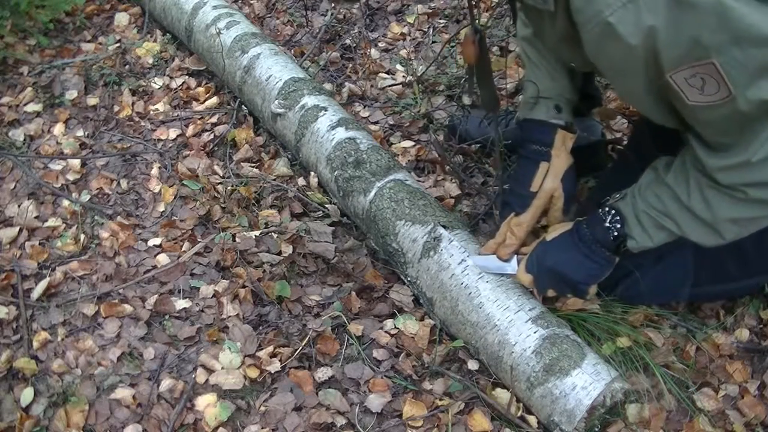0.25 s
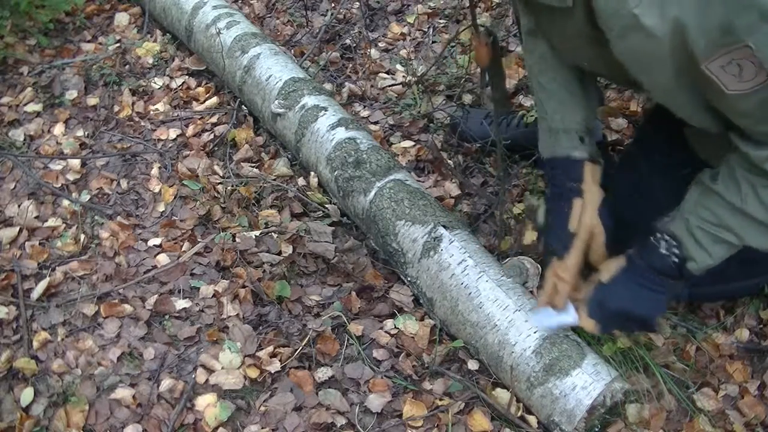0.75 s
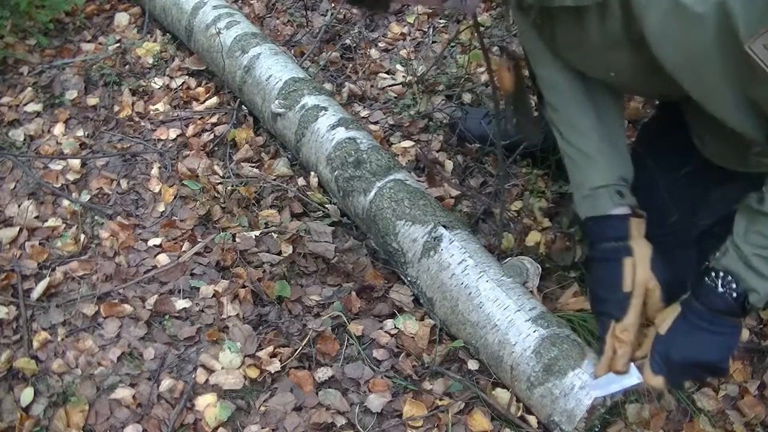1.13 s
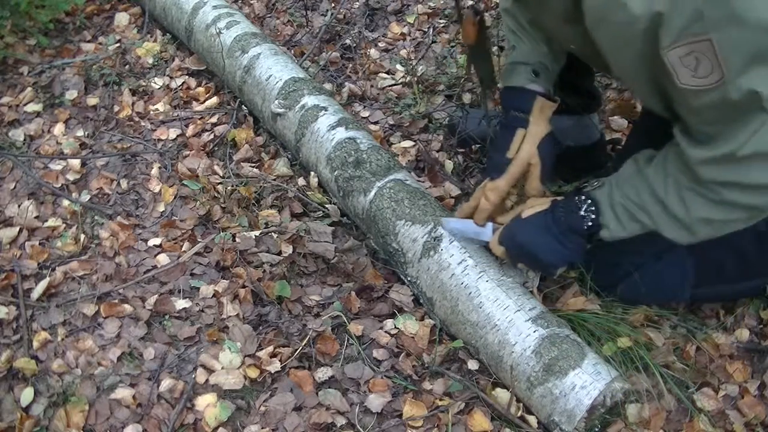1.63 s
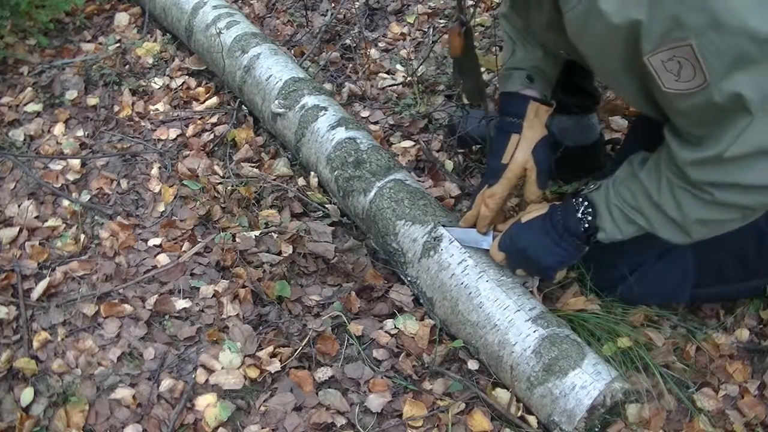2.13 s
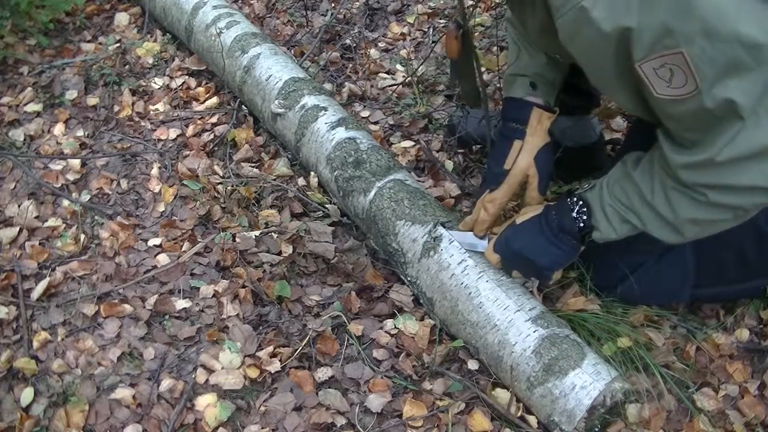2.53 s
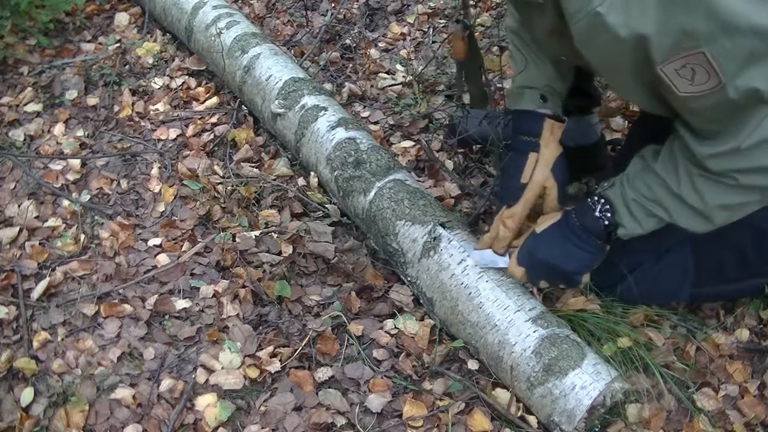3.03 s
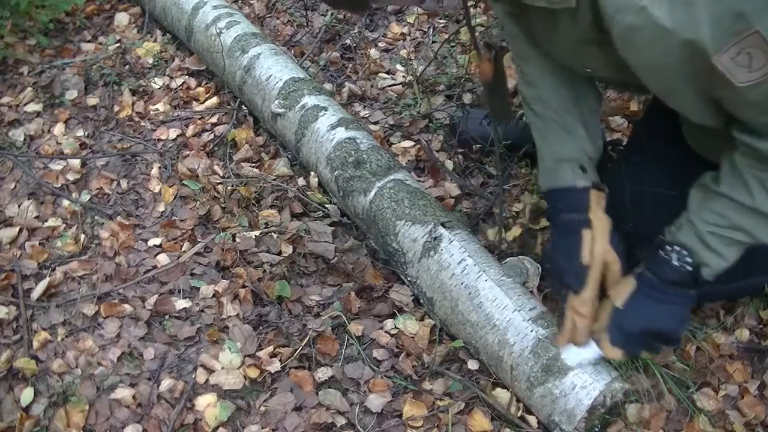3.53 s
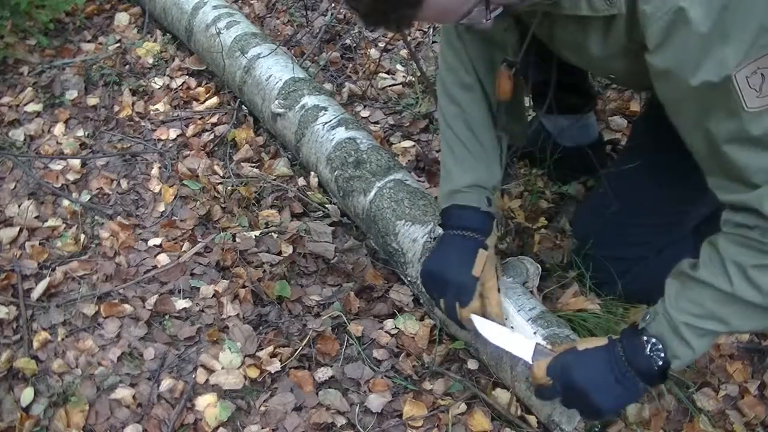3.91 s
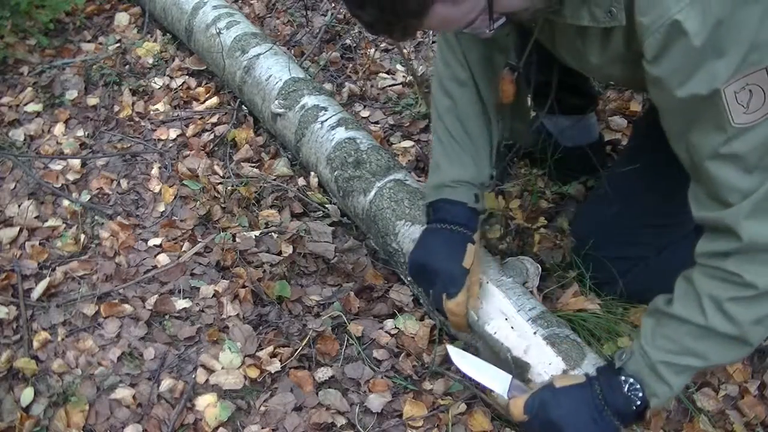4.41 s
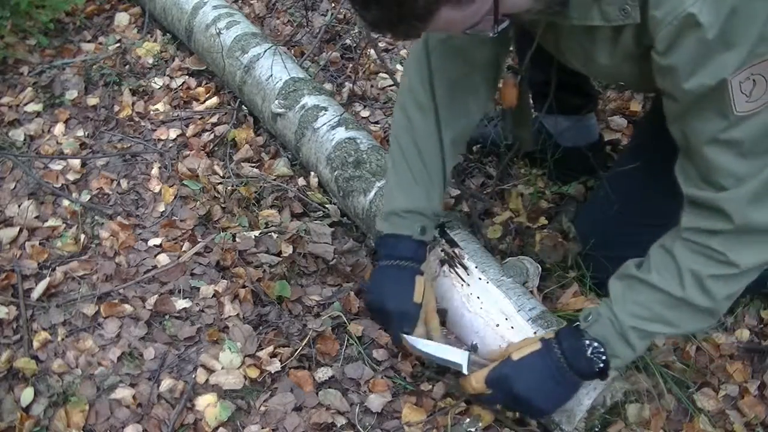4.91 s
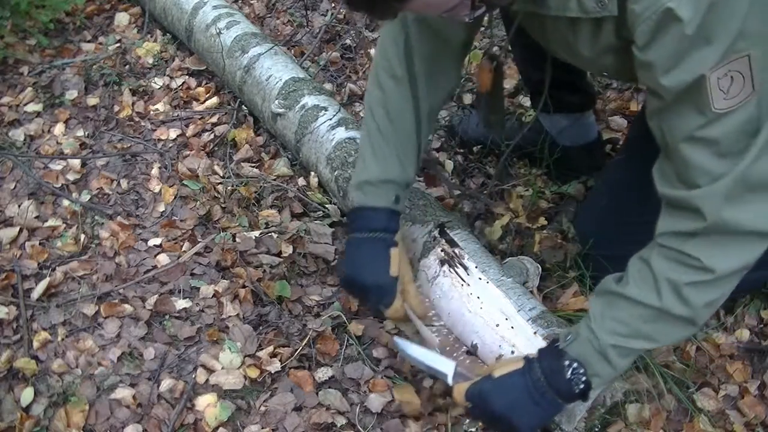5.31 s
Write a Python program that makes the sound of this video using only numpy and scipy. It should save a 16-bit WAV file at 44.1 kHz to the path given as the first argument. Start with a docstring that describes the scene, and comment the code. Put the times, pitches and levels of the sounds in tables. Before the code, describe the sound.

Close crisp bark peeling: faint rustles and short scratches, a hard crackly rip, a brief soft rub, then looser rattling tears with small pops.

```python
"""Peeling bark off a birch log

A gloved hand slits the bark with a knife and peels it off, kneeling in dry leaves in a quiet forest.
Fibres let go in showers of tiny filtered noise bursts, duller where the loose sheet prevails; single
snaps and hollow pops are decaying sines, and the log answers with low thumps of noise-driven modes.
The glove is band-passed slips, the blade rings under grit, the forest is noise with a drifting spectrum.
A small camera with two close microphone ports stands near: the ports differ in level and phase."""
import sys
import numpy as np
from scipy import signal
from scipy.fft import rfft, irfft, next_fast_len
from scipy.io import wavfile
from scipy.ndimage import uniform_filter1d

SR = 44100
rng = np.random.default_rng(int(sys.argv[2]) if len(sys.argv) > 2 else 0)


def waveform_to_disk(signal):
    """Save audio, clipped to [-1, 1], as 16-bit WAV at the path in sys.argv[1]."""
    frames = np.transpose(np.atleast_2d(signal))
    scaled = np.clip(frames, -1, 1) * 32767
    samples = np.round(scaled).astype(np.int16)
    wavfile.write(sys.argv[1], SR, samples)


N = 245195

# relative spectrum of tight fibres as the small microphones pick them up:
# (frequency [Hz], level per hertz [dB])
TIGHT_SPECTRUM = [(700, -28.5), (1300, -14.5), (2000, -13), (2900, -6.5), (3550, -5.5), (4100, -3.5),
                  (4700, 3), (5600, -3), (7500, -7.5), (8700, -14), (10700, -14), (12300, -21),
                  (14500, -27.5), (16500, -10)]


def amp(db):
    """Decibel law: a level becomes an amplitude ratio."""
    return 10 ** (np.asarray(db) / 20)


def evened(x):
    """Normalization to unit root mean square."""
    return x / np.sqrt(np.mean(x ** 2) + 1e-20)


def read(points, hz):
    """Linear interpolation of a curve over logarithmic frequency."""
    f, value = np.transpose(points)
    return np.interp(np.log(hz + 1), np.log(f + 1), value)


def curves(rows):
    """Linear interpolation of each column over time."""
    s, *columns = np.transpose(rows)
    times = np.arange(N) / SR
    return [np.interp(times, s, column) for column in columns]


def add(mix, s, sound):
    """Superposition: adds a sound in place from the time s [s]."""
    part = mix[max(round(s * SR), 0):][:len(sound)]
    part += sound[:len(part)]


def colour(points, size=1024):
    """Minimum-phase filter of energy 1: the Hilbert transform of the log gain gives the phase."""
    hz = abs(np.fft.fftfreq(4 * size, 1 / SR))
    log_gain = np.log(amp(np.maximum(read(points, hz), -100)))
    taps = np.fft.ifft(np.exp(np.conj(signal.hilbert(log_gain)))).real[:size]
    return taps / np.linalg.norm(taps)


def swells(rows):
    """Incoherent sum: the powers of (peak [s], rise [s], fall [s], level [dB]) humps add up to a gain."""
    bend = 1.3  # 1 = pointed peak, 2 = round peak
    t = np.arange(0, N, 32) / SR
    power = 0
    for s, rise, fall, db in rows:
        distance = abs(t - s) / np.where(t < s, rise, fall)
        power = power + amp(db - 20 * distance ** bend) ** 2  # rise and fall each span 20 dB
    return np.interp(np.arange(N) / SR, t, np.sqrt(power))


def shower(spread_db, per_s, t60, count=60):
    """Shot noise of steady mean power: chance impulses excite a few bursts, each with its own colour."""
    humps_db = 4  # how unevenly each burst is coloured
    struck = rng.exponential(1, N), rng.random(N) < per_s / SR
    size = amp(spread_db * np.minimum(struck[0], 4.5)) * struck[1]
    size = size / np.sqrt(uniform_filter1d(size ** 2, size=6000) + 1e-9)
    shape = rng.integers(0, count, N)
    t = np.arange(600) / SR
    out = np.zeros(N)
    for k, stretch in enumerate(np.geomspace(.3, 2.5, num=count)):
        humps = rng.standard_normal(len(t) // 2 + 1)
        humps = evened(uniform_filter1d(uniform_filter1d(humps, size=12), size=12))
        coloured = irfft(rfft(rng.standard_normal(len(t))) * amp(humps_db * humps))
        burst = coloured * amp(-60 * t / (t60 * stretch))
        out += signal.oaconvolve(size * (shape == k), burst / np.linalg.norm(burst))[:N]
    return evened(out)


def forest():
    """Random short-time spectra: distant wash and stirring leaves, in patches that drift in level."""
    # relative spectrum of the wash: (frequency [Hz], level per hertz [dB])
    wash_spectrum = [(15, -46), (25, -5), (87, 2.5), (317, 6.5), (624, -1.5), (936, -1.5), (1260, -8),
                     (2160, -4.5), (4740, -9), (6920, -4.5), (8830, -14), (10700, -28), (12200, -20),
                     (14400, -22), (16000, -20)]
    # left-right likeness, limited below to -1..1: (frequency [Hz], correlation [1])
    likeness = [(60, 0.017), (180, -0.59), (550, 0.53), (1650, 0.25), (4970, -1.44), (15000, 0.87)]
    level_db, patch_db = -56.5, 1.5
    frames, hz = N // 256 + 5, np.fft.rfftfreq(1024, 1 / SR)
    a, b, c, d, patches = rng.standard_normal((frames, 513, 5)).T
    patches = uniform_filter1d(patches, size=12, axis=0)  # along frequency
    patches = evened(uniform_filter1d(patches, size=14, axis=1))  # along time
    same = np.clip(read(likeness, hz), -1, 1)[:, None]
    left = a + 1j * b
    right = same * left + np.sqrt(1 - same ** 2) * (c + 1j * d)
    spectra = np.array([left, right]) * amp(read(wash_spectrum, hz)[:, None] + patch_db * patches)
    wash = signal.istft(spectra, nperseg=1024, noverlap=768)[1][:, :N]
    return amp(level_db) * evened(signal.lfilter(*signal.butter(2, 70, "high", fs=SR), wash))


def work():
    """Power addition of tugs and steady scuffing: gains of tight fibres, loose sheet and papery skin."""
    # scuffing between the tugs: (time [s], tight fibres [dB], papery skin and dry leaves [dB])
    scuffing = [(0.0, -56.5, -66), (0.12, -55.5, -62.5), (0.55, -56, -66.5), (0.79, -56, -65),
                (1.08, -51, -61.5), (1.55, -53.5, -62), (1.92, -56.5, -65), (2.15, -48, -55),
                (2.41, -59.5, -69), (2.92, -70, -65), (3.5, -56.5, -68), (3.68, -50.5, -65),
                (3.8, -56.5, -66), (4.13, -54.5, -66), (4.6, -54, -62), (5.0, -56, -67), (5.18, -51, -61.5),
                (5.56, -56, -72)]
    # tugs at the bark: (peak [s], rise [s], fall [s], tight fibres [dB],
    # loose sheet against them [dB], papery skin against them [dB])
    tug_rows = [(0.34, 0.032, 0.044, -35.5, -35, -25), (0.605, 0.048, 0.2, -44.5, -11, -9),
                (0.865, 0.08, 0.11, -47, -25, -12), (1.272, 0.035, 0.049, -43.5, -9.5, -8),
                (1.37, 0.049, 0.25, -49, -11, -7.5), (1.457, 0.057, 0.045, -46, -20, -10),
                (1.604, 0.037, 0.084, -44.5, -32, -12), (1.827, 0.18, 0.095, -51.5, -9, -5.5),
                (1.96, 0.03, 0.048, -48.5, -20, -8), (2.262, 0.24, 0.16, -41, -15, -11.5),
                (2.56, .11, .16, -32, -13, -11), (2.66, .1, .16, -36, -14, -8),
                (2.76, .08, .16, -40, -8, -8), (2.968, 0.01, 0.072, -52, 0.5, -16),
                (3.06, 0.044, 0.057, -37, -3.5, -13), (3.22, 0.48, 0.46, -44, -6.5, -12),
                (3.534, 0.023, 0.072, -44, -9, -14), (3.982, 0.038, 0.062, -39, -10.5, -10),
                (4.038, 0.037, 0.07, -35, -27, -16), (4.162, 0.016, 0.062, -39, -18, -12),
                (4.222, 0.028, 0.2, -30, -10, -17), (4.291, 0.034, 0.026, -33, 9, -26),
                (4.325, .03, 0.027, -38.5, 9.5, -18), (4.376, 0.073, 0.11, -34, 8, -16),
                (4.466, 0.2, 0.017, -35.5, 6, -5.5), (4.495, 0.027, 0.04, -50.5, -8, -6),
                (4.646, 0.025, 0.27, -52, 6.5, -8), (4.71, 0.076, 0.13, -45, -0.5, -12),
                (4.791, 0.023, 0.0059, -40.5, 9.5, -15), (4.894, 0.083, 0.16, -42, -7, -10),
                (5.044, 0.091, 0.052, -38, -5.5, -15), (5.109, 0.075, 0.041, -42.5, 1.5, -10),
                (5.135, 0.012, 0.027, -41, -13, -16), (5.37, 0.14, 0.25, -46.5, -1.5, -11.5)]
    scuff_loose_db = -10  # loose sheet against tight fibres while scuffing
    scuff_db, leaves_db = curves(scuffing)
    tight = swells([row[:4] for row in tug_rows])
    loose, skin = (swells([(*row[:3], row[3] + row[k]) for row in tug_rows]) for k in (4, 5))
    return (np.hypot(tight, amp(scuff_db)),
            np.hypot(loose, amp(scuff_db + scuff_loose_db)),
            np.hypot(skin, amp(leaves_db)))


def clumps():
    """Amplitude modulation: fibres give way in uneven bunches of about a hundredth of a second."""
    bunches = uniform_filter1d(uniform_filter1d(rng.standard_normal(N), size=300), size=300)
    return evened(amp(1.2 * evened(bunches)))


def crackle():
    """Filtered shot noise: tight fibres fizz in a wandering colour, a loose sheet rattles lower and longer."""
    # relative spectrum of the freed sheet: (frequency [Hz], level per hertz [dB])
    loose_spectrum = [(300, -29.5), (800, -22), (1400, -22), (1650, -5.5), (2100, -0.5), (2500, -4.5),
                      (3000, -5.5), (3600, -3.5), (4300, -8), (6000, -21.5), (8000, -37.5)]
    shift = .1  # share by which the fibre colour wanders down and up
    tight_gain, loose_gain, _ = work()
    drift = evened(uniform_filter1d(uniform_filter1d(rng.standard_normal(N), size=2000), size=2000))
    turn = np.pi / 4 * (1 + np.tanh(drift))  # crossfade angle, 0 = low colour
    grit = shower(spread_db=3.0, per_s=3400, t60=0.006)
    low, high = (colour([(hz * (1 + side * shift), db) for hz, db in TIGHT_SPECTRUM]) for side in (-1, 1))
    tight = signal.oaconvolve(grit * np.cos(turn), low)[:N]
    tight += signal.oaconvolve(grit * np.sin(turn), high)[:N]
    tight = signal.sosfilt(signal.butter(4, 8500, fs=SR, output="sos"), evened(tight))
    rattle = shower(spread_db=3.5, per_s=2500, t60=0.01)
    loose = signal.oaconvolve(rattle, colour(loose_spectrum))[:N]
    return tight_gain * tight + loose_gain * loose


def papery():
    """Partial coherence: the finest crackle comes from a wide patch, so the ports share only part of it."""
    # relative spectrum of papery skin and dry leaves: (frequency [Hz], level per hertz [dB])
    skin_spectrum = [(2000, -14), (5000, -14), (7500, 6), (8700, -2.5), (10700, 8), (12300, -1),
                     (14500, 4.5), (16500, -18)]
    both, left, right = (shower(spread_db=3.5, per_s=3100, t60=0.00064, count=8) for _ in range(3))
    pair = evened(both + 1.2 * np.array([left, right]))
    skin_gain = work()[2]
    return skin_gain * signal.oaconvolve(pair, colour(skin_spectrum)[None])[:, :N]


def snaps():
    """Impulsive release: a fibre parts at once, the bark rings in neighbouring modes and frays."""
    # distinct snaps: (time [s], peak level, held to -3 at most [dB], ring frequency [Hz],
    # sharp edge against the ring [dB], t60 of the ring [ms])
    snap_rows = [(0.103, -39, 5060, 21, 12.8), (0.3126, -22, 5400, -13, 4.8), (0.3188, -35, 3140, -8, 7.5),
                 (0.3256, -15, 4940, 14, 8.8), (0.3302, -24, 3530, -14, 16), (0.3439, -16, 4750, 0, 8.5),
                 (0.346, -4, 5160, -9, 5.5), (0.3505, -23, 3750, -5, 14), (0.4156, -30.5, 4430, 0, 2.3),
                 (0.587, -20, 3560, 8, 7.6), (0.5948, -16.5, 5000, 18, 5), (0.6097, -21, 5040, -12, 6.6),
                 (0.6237, -13.5, 5350, 10, 4), (0.634, -25, 4890, -8, 8), (0.65, -29, 4630, -8, 5.5),
                 (0.667, -31, 4740, -5, 8.6), (0.7427, -25, 5960, -28, 6.8), (0.853, -23, 4470, -10, 4),
                 (0.8608, -25, 4420, 3, 8.3), (0.866, -25.5, 4450, -11, 4.2),
                 (0.8788, -26.5, 3720, 0.5, 12), (0.9802, -34, 4070, -2.5, 9), (1.108, -26.5, 4400, 5, 11),
                 (1.114, -32, 5340, 19, 6.4), (1.131, -19, 5340, 17, 12), (1.132, -19.5, 10670, -8, 4.4),
                 (1.2027, -31, 4500, 0, 3.6), (1.365, -28, 4670, 16, 6), (1.457, -17, 5130, 15, 4.8),
                 (1.4653, -30, 3970, 0, 5), (1.839, -23.5, 8230, 1, 8.4), (2.171, -22, 4470, 24, 8.2),
                 (2.2044, -19, 5490, 7, 4.8), (2.242, -11.5, 5600, 7, 4), (2.2529, -11, 5340, -8, 3.7),
                 (2.2557, -18, 6200, 6, 12), (2.5225, -23, 4700, -16, 3.4), (2.535, -17, 5400, 4, 13),
                 (2.542, -2.5, 5960, -24, 1.3), (2.545, -1, 4260, 3, 2.4), (2.55, -17, 3470, -11, 9.1),
                 (2.557, -12, 4660, -8, 6.7), (2.563, -16, 3580, -18, 19), (2.568, -10, 4600, -4, 6.9),
                 (2.5752, -12, 4310, -8, 4.5), (2.5793, -3, 4430, -1, 3.6), (2.587, -15, 5340, 2, 5.3),
                 (2.6047, -7.5, 4270, -0.5, 0.96), (2.619, -17, 3550, 5, 7.4), (2.6256, -18, 3940, 6, 4.5),
                 (2.6563, -22, 3470, 20, 11), (2.728, -19.5, 2570, 2, 21), (2.7543, -9, 3600, 2.5, 5.8),
                 (2.8339, -23, 4800, 16, 6.2), (2.9937, -31, 3100, -1, 8), (3.048, -25, 4400, -8, 8),
                 (3.0575, -12, 3570, -3, 15), (3.0766, -22.5, 2270, -7, 9), (3.279, -23.5, 4400, 1, 4.9),
                 (3.5307, -27.5, 3460, 2, 19), (3.592, -29, 4195, 7, 12), (3.9845, -29, 4230, -9, 7),
                 (4.032, -19, 4800, -11, 7.2), (4.0339, -14.5, 5000, 6.5, 7.7), (4.037, -8.5, 4670, 8, 3.7),
                 (4.056, -19, 4870, 4, 3), (4.0627, -11, 4200, -1.5, 6.9), (4.0776, -12.5, 4460, -2, 7.5),
                 (4.1495, -27, 4800, -14, 3), (4.1705, -17, 5850, 4, 8.3), (4.2, -21, 3640, -8, 6.6),
                 (4.21, -22, 6000, 0, 7.2), (4.221, -21, 3630, -10, 14), (4.262, -21, 3900, -5, 6),
                 (4.2768, -20, 3020, -15, 8.7), (4.2846, -7.5, 2240, -7, 32),
                 (4.2909, -7.5, 1890, -2.5, 17), (4.293, -11, 3700, -21, 11), (4.3104, -10, 2060, -10, 23),
                 (4.326, -23, 1980, -14, 19), (4.3465, -12, 2020, -3, 6.3), (4.3517, -15, 4460, 1, 4.6),
                 (4.3617, -11.5, 4470, -16, 11), (4.3675, -16, 4600, -8, 7), (4.3749, -10, 2080, 10, 8.5),
                 (4.3775, -10, 2910, -1, 11), (4.395, -18, 2740, 3, 5.4), (4.4, -8.5, 2670, -0.5, 7.4),
                 (4.413, -9.5, 3060, -5, 3.3), (4.424, -17, 2820, -23, 14), (4.439, -11, 4400, 6, 8.4),
                 (4.4532, -16, 3230, -3, 8.3), (4.458, -19, 4590, -1, 8), (4.531, -23.5, 6000, -21, 2.6),
                 (4.5595, -28.5, 4680, 4, 2.3), (4.6386, -36, 3400, -2, 6), (4.6595, -39, 3280, -6, 9),
                 (4.7521, -28.5, 2830, -3, 7.6), (4.761, -27, 4600, -5, 6.2), (4.779, -19, 2850, -24, 20),
                 (4.7827, -19.5, 3280, -11, 11), (4.7876, -19.5, 2360, -5.5, 25),
                 (4.894, -23, 5200, 15, 20), (4.9045, -27, 4020, -11, 8.5), (5.001, -25.5, 2450, -2, 9),
                 (5.021, -16.5, 1970, 2.5, 6.4), (5.0572, -26, 2190, -7, 10), (5.087, -19.5, 2080, 2, 15),
                 (5.0988, -29, 2260, 3, 5.5), (5.11, -30, 4600, -4, 13), (5.1292, -9, 3370, -2, 2.4),
                 (5.166, -29, 2600, 2, 5), (5.351, -33, 4700, 2, 4.4), (5.386, -33.5, 4700, 2, 9.2),
                 (5.499, -36, 2760, -15, 9)]
    out, t, edge_colour = np.zeros(N), np.arange(1200) / SR, colour(TIGHT_SPECTRUM)
    fray = rng.standard_normal((len(snap_rows), len(t)))
    neighbours = rng.uniform(.75, 1.35, (len(snap_rows), 3))  # mode frequencies against the ring
    for (s, db, hz, edge_db, t60_ms), noise, ratios in zip(snap_rows, fray, neighbours):
        fade = amp(-60 * t / (t60_ms / 1000))
        modes = np.sin(2 * np.pi * hz * t)
        modes += .35 * np.sin(2 * np.pi * hz * np.outer(ratios, t)).sum(axis=0)
        ring = modes * fade * (1 - np.exp(-t * hz / 0.17))  # swells within a cycle
        frayed = .18 * noise * np.sqrt(fade)  # dies away half as fast as the ring
        edge = np.convolve(frayed + (t == 0), edge_colour)[:len(t)]
        snap = ring / abs(ring).max() + amp(edge_db) * edge / abs(edge).max()
        # a small patch sends out little below its ring
        snap = signal.lfilter(*signal.butter(3, .5 * hz, "high", fs=SR), snap)
        add(out, s, amp(min(db, -3)) * snap / abs(snap).max())
    # high-pass: keeps the snaps free of bass
    return signal.sosfilt(signal.butter(4, 1350, "high", fs=SR, output="sos"), out)


def log():
    """Forced vibration of damped modes: uneven pushes shake the log, and the wood groans under load."""
    # log on soft ground: (frequency [Hz], width [Hz], relative level [dB])
    log_modes = [(92.9, 10.4, -1.5), (63.7, 19, -4), (30, 57, -8)]
    # weight landing on the log: (peak [s], thump level [dB], rise [s], fall [s])
    lean_rows = [(0.36, -65, 0.068, 0.092), (0.6, -66, 0.062, .04), (0.71, -65, 0.073, 0.076),
                 (0.87, -71, 0.071, 0.035), (1.16, -64, 0.056, 0.23), (1.41, -61, 0.058, 0.037),
                 (1.5, -61.5, 0.038, 0.15), (1.87, -65, 0.11, 0.077), (2.17, -66, 0.25, 1),
                 (2.55, -63, 0.11, 0.33), (2.69, -55, 0.094, 0.22), (3.1, -66.5, 0.1, 0.1),
                 (4.01, -59.5, 0.1, 0.13), (4.3, -56, 0.2, 0.32), (4.51, -61.5, 0.46, 0.069),
                 (4.83, -60.5, 0.18, 0.062), (5.17, -64.5, 0.52, 0.042)]
    rest_db = -92
    groan_hz, groan_width_hz, groan_db = 408, 280, -2  # level against the shake
    push, t = rng.standard_normal(N), np.arange(8000) / SR
    modes = 0
    for hz, w, db in log_modes:
        envelope = np.exp(-np.pi * w * t) * np.pi * w * t
        modes = modes + amp(db) * envelope * np.sin(2 * np.pi * hz * t)
    shake = signal.lfilter(*signal.butter(2, 120, fs=SR), signal.oaconvolve(push, modes)[:N])
    groan_mode = np.exp(-np.pi * groan_width_hz * t) * t * np.sin(2 * np.pi * groan_hz * t)
    groan = signal.oaconvolve(push, groan_mode)[:N]
    leans = swells([(s, rise, fall, db) for s, db, rise, fall in lean_rows])
    weight = np.hypot(leans, amp(rest_db))
    return weight * (evened(shake) + amp(groan_db) * evened(groan))


def rasp():
    """Excited resonance: fine grit slips under the edge and rings the damped blade along the cut."""
    # swells of the rasp: (peak [s], rise [s], fall [s], level [dB])
    rasp_rows = [(2.655, 0.072, 0.17, -32.5)]
    # blade held in the cut: (frequency [Hz], width [Hz], relative level [dB])
    blade_modes = [(3550, 420, 0.5), (4750, 2300, 4), (5490, 240, -5)]
    t = np.arange(600) / SR
    blade = 0
    for hz, w, db in blade_modes:
        envelope = np.sqrt(w) * np.exp(-np.pi * w * t) * w * t
        blade = blade + amp(db) * envelope * np.sin(2 * np.pi * hz * t)
    grit = shower(spread_db=2.5, per_s=2700, t60=0.0011, count=8)
    return swells(rasp_rows) * evened(signal.oaconvolve(grit, blade)[:N])


def glove():
    """Stick-slip friction: soft slips of leather pass one wide resonance that wanders with the grip."""
    # glove dragging over the wood: (time [s], rub level [dB], centre frequency [Hz])
    rub_rows = [(2.94, -85, 1000), (2.97, -58, 960), (3.02, -82, 1300), (3.1, -54, 1530), (3.16, -56, 1040),
                (3.22, -52.5, 1340), (3.35, -62, 1020), (3.45, -73, 990)]
    rub_db, hz = curves(rub_rows)
    turn = np.exp(2j * np.pi * np.cumsum(hz) / SR)
    slips = shower(spread_db=2.5, per_s=2000, t60=0.02, count=8)
    # shifted down to zero, low-passed and shifted back: a moving band-pass
    band = turn * signal.lfilter(*signal.butter(2, 450, fs=SR), slips / turn)
    return amp(rub_db) * evened(band.real)


def pops():
    """Cavity resonance: air trapped under the sheet thuds briefly and climbs in pitch as the gap opens."""
    # sheet popping off the wood: (time [s], level [dB], middle of the climb [Hz], t60 [s])
    pop_rows = [(4.002, -43, 290, 0.038), (4.29, -24, 382, 0.036), (4.789, -29, 321, 0.03),
                (5.081, -43, 372, 0.039), (5.129, -27, 1140, 0.012)]
    out, t = np.zeros(N), np.arange(5000) / SR
    for s, db, hz, t60 in pop_rows:
        climb = 1.3 - 0.6 * np.exp(-t / 0.006)  # from 0.7 to 1.3 of the middle
        turns = np.cumsum(hz * climb) / SR
        thud = np.sin(2 * np.pi * turns)
        thud += .4 * np.sin(2 * np.pi * 2.9 * turns)  # the sheet adds a higher mode
        add(out, s, amp(db - 60 * t / t60) * (1 - np.exp(-t / 0.0032)) * thud)
    return out


def scatter(x, t60=0.03):
    """Diffuse reflection: log, body and leaf litter return a short bright spray, another at each port."""
    t = np.arange(4000) / SR
    taps = rng.standard_normal((2, len(t))) * amp(-60 * t / t60) * (t > .0005)
    taps = signal.lfilter([1, -.6], [1], taps)  # brightens
    return signal.fftconvolve(x[None], taps / np.linalg.norm(taps[0]), axes=1)[:, :N]


def ports(pair, lead):
    """Diffraction: the camera body shades each port and shifts its phase in its own way."""
    # phase by which left leads, to be scaled by lead: (frequency [Hz], phase [rad])
    port_lead = [(20, 0), (4500, 0), (5680, -.85), (6550, .2), (7700, -.6), (8400, -2.2), (9200, -1.9),
                 (10300, -.1), (11500, .1), (13400, -1.2), (14800, -.3)]
    # left minus right: (frequency [Hz], level difference [dB])
    port_balance = [(60, -1.5), (250, -2.3), (1000, -3.2), (2000, -4), (5000, -3.5), (9000, -5), (15000, 0)]
    size = next_fast_len(N)
    hz = np.fft.rfftfreq(size, 1 / SR)
    # each port takes half of the difference
    half = amp(read(port_balance, hz) / 2) * np.exp(.5j * lead * read(port_lead, hz))
    return irfft(rfft(pair, size) * np.array([half, 1 / half]), size)[:, :N]


def scene():
    """Superposition of bark, echoes, skin, glove, pops and log at the ports, over the forest."""
    bunches = clumps()
    bark = bunches * crackle() + rasp() + snaps()
    echoes = amp(-20) * scatter(bark)
    near = bark + echoes + bunches * papery() + glove() + pops() + log()
    return ports(near, lead=0.94) + ports(forest(), lead=0)


def record(dry):
    """Band limitation by a linear-phase low-pass."""
    edge_hz = 15800
    lowpass = signal.firwin(511, edge_hz, window=("kaiser", 9), fs=SR)
    return signal.oaconvolve(dry, lowpass[None], "same")


dry = scene()
out = record(dry)
waveform_to_disk(out)
```